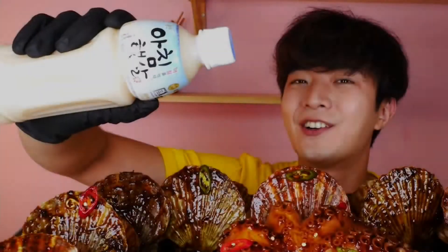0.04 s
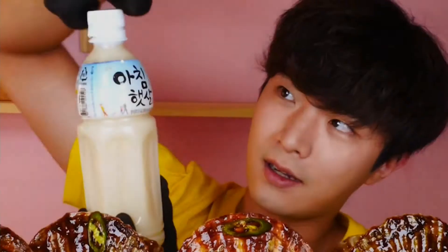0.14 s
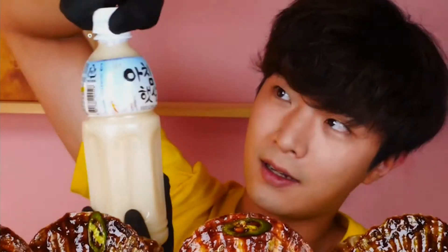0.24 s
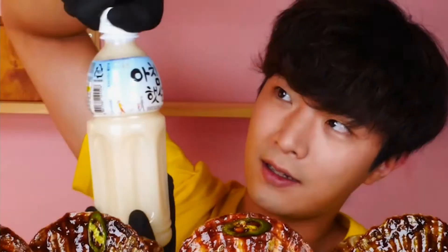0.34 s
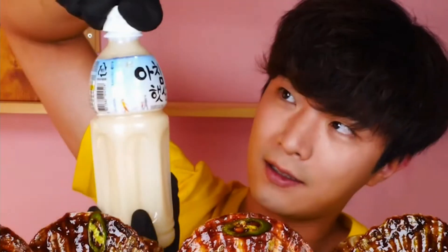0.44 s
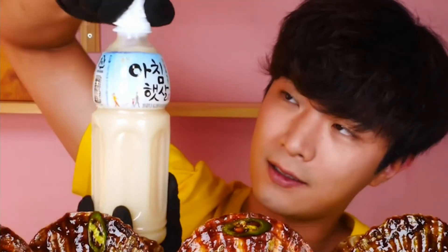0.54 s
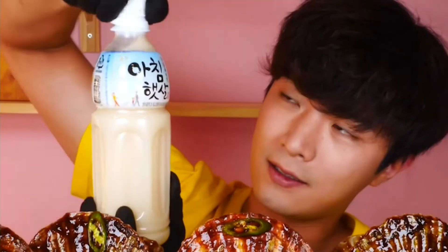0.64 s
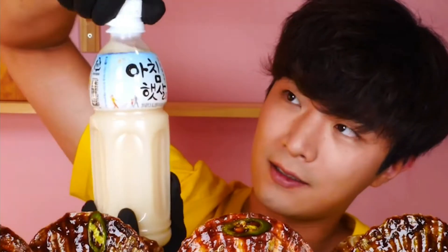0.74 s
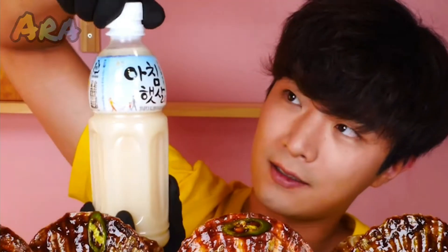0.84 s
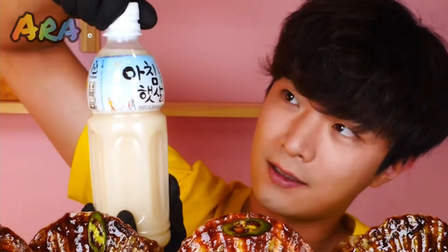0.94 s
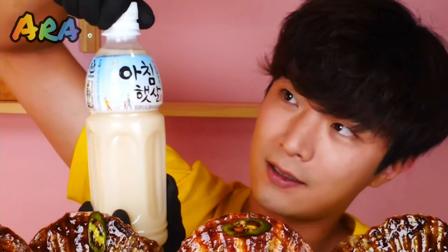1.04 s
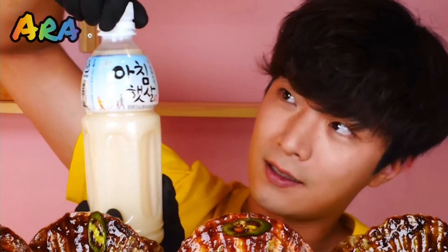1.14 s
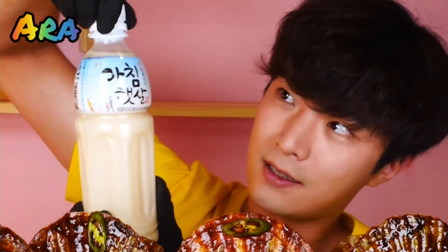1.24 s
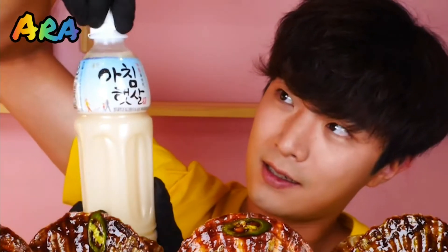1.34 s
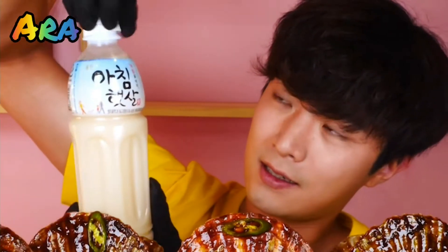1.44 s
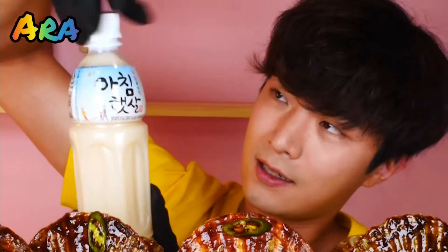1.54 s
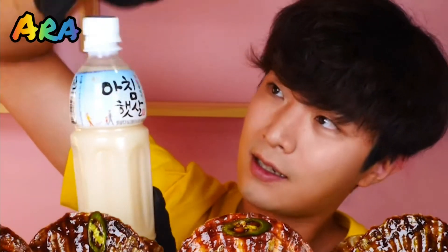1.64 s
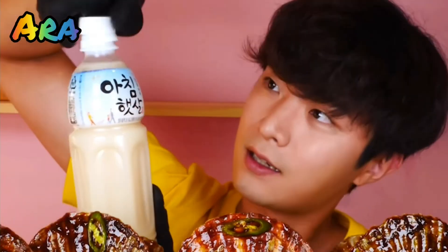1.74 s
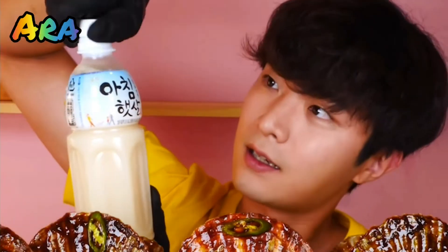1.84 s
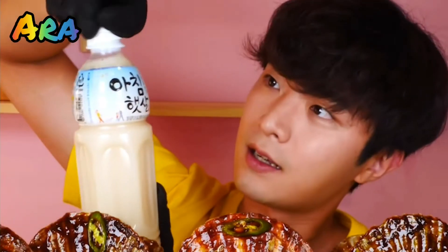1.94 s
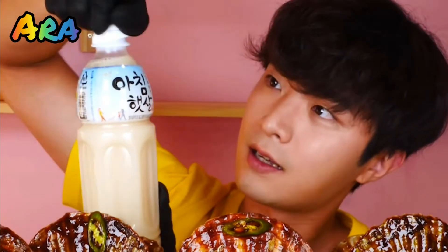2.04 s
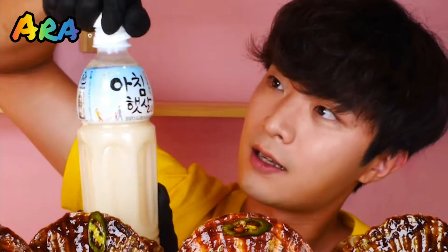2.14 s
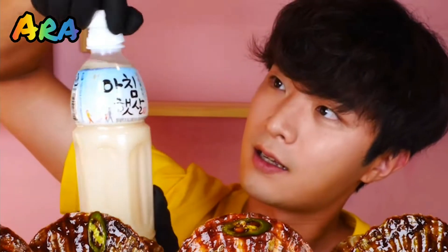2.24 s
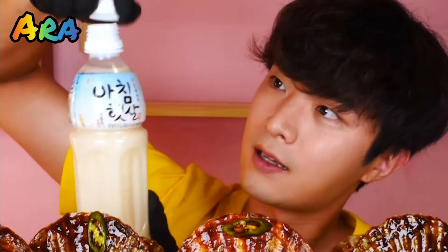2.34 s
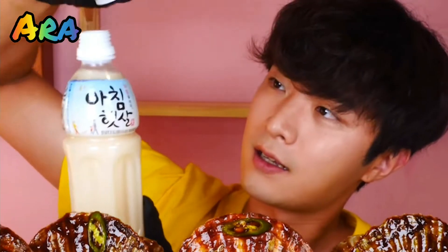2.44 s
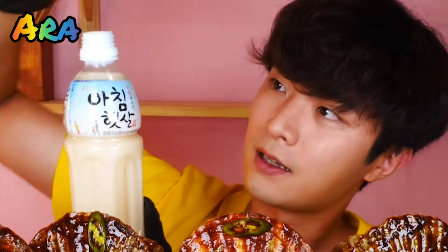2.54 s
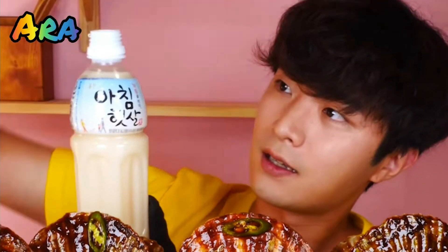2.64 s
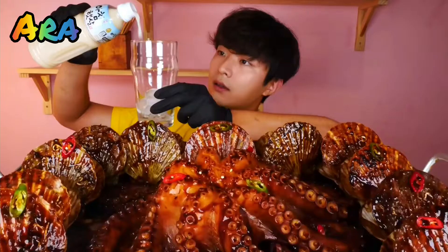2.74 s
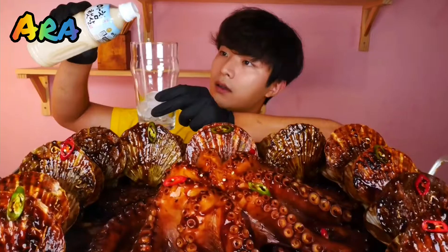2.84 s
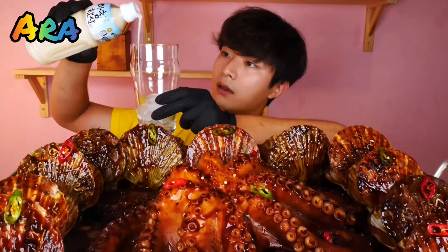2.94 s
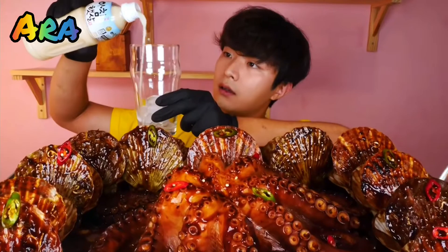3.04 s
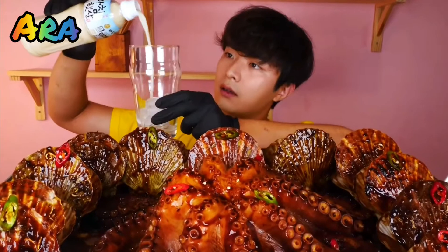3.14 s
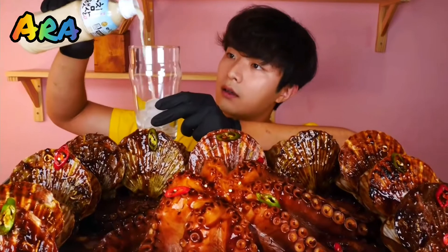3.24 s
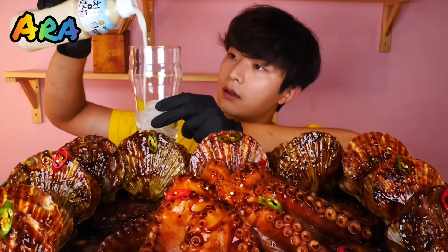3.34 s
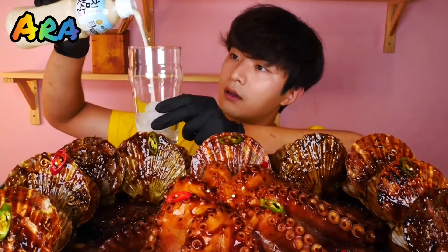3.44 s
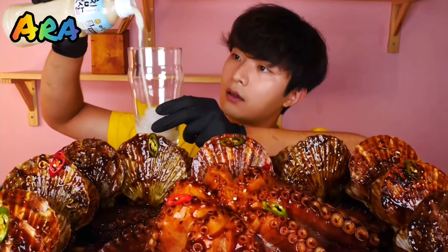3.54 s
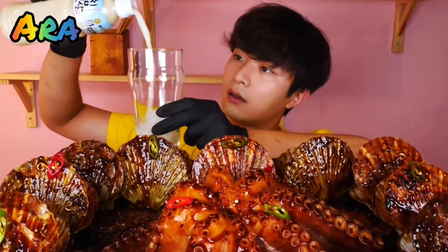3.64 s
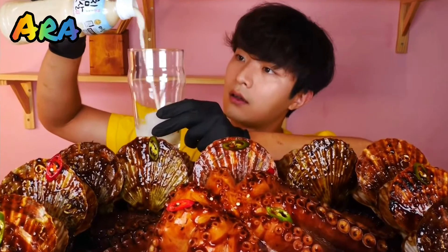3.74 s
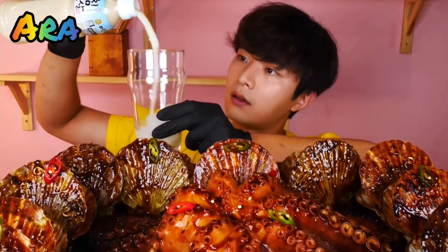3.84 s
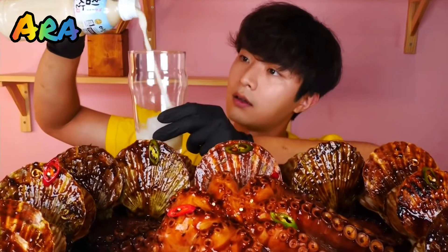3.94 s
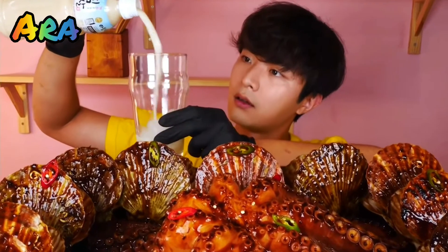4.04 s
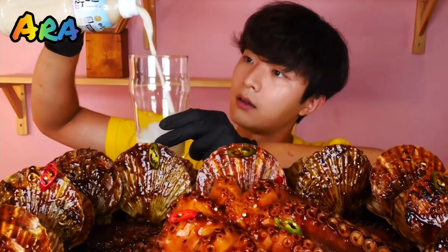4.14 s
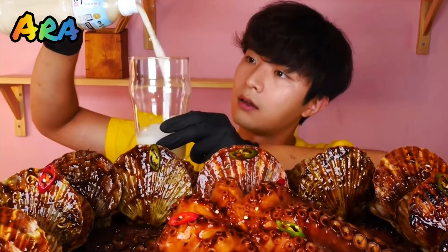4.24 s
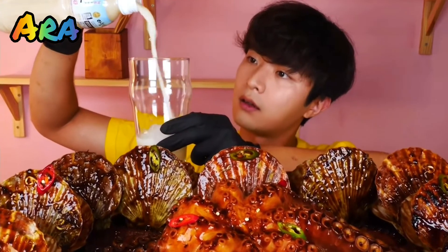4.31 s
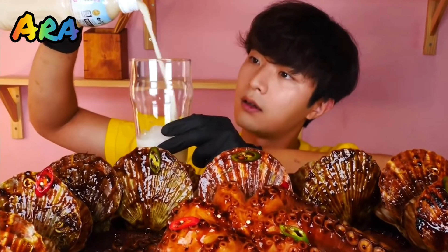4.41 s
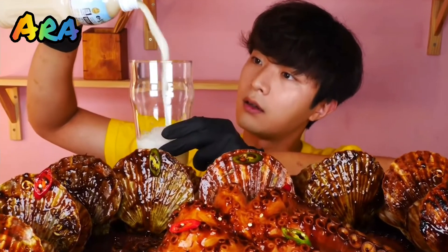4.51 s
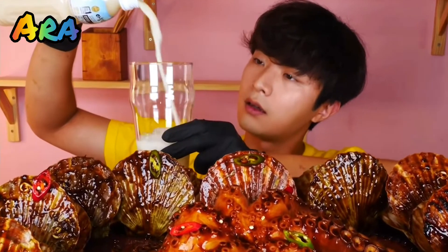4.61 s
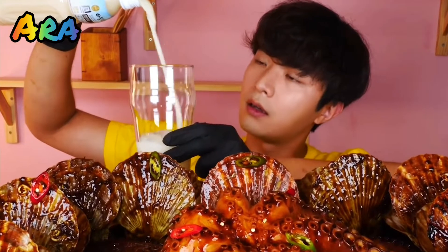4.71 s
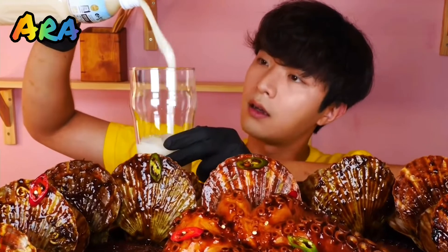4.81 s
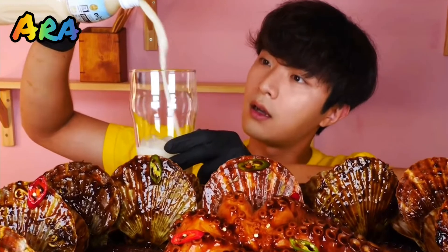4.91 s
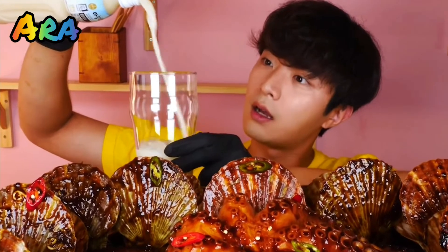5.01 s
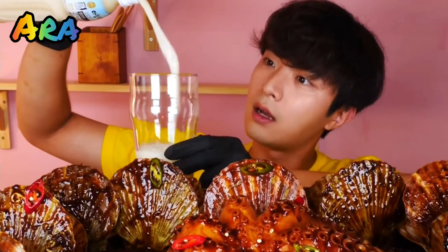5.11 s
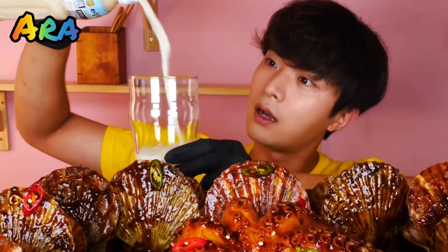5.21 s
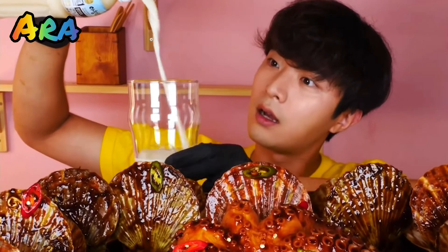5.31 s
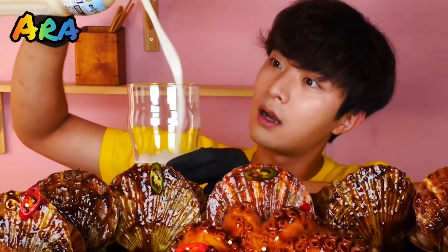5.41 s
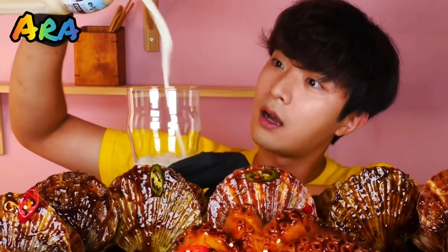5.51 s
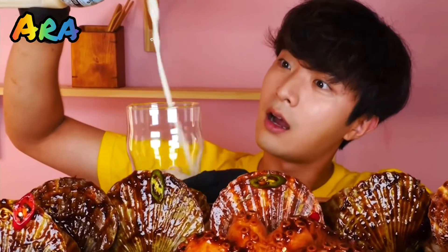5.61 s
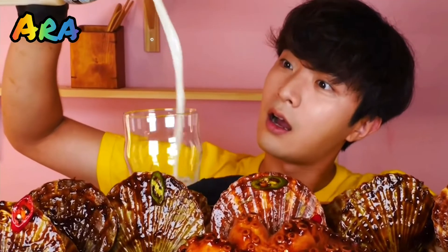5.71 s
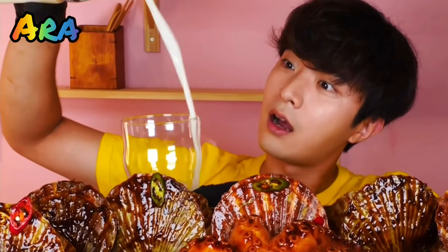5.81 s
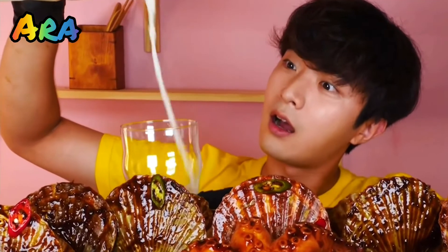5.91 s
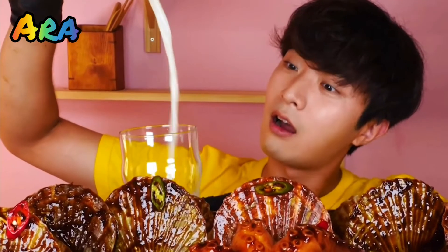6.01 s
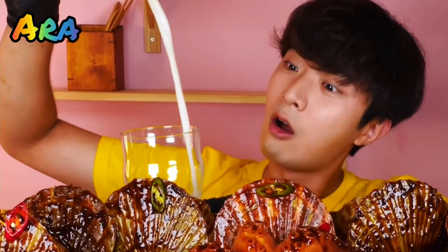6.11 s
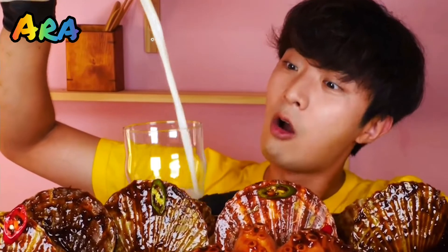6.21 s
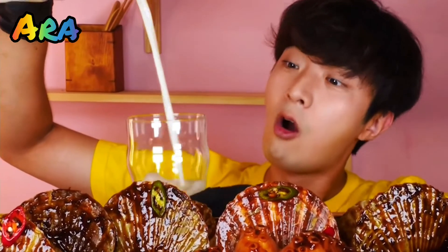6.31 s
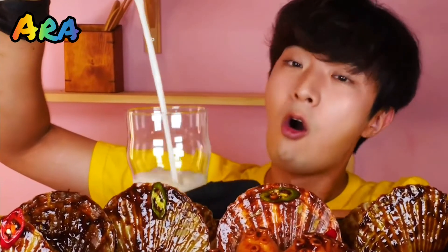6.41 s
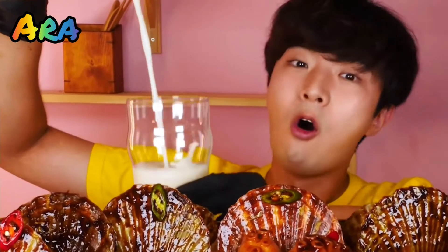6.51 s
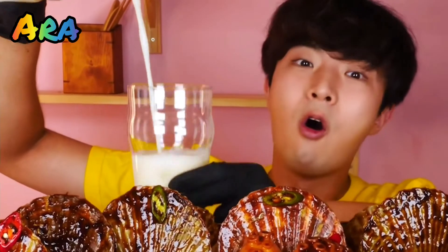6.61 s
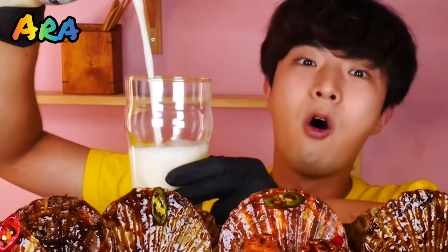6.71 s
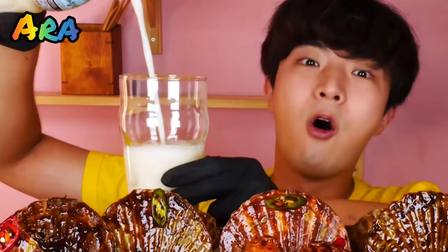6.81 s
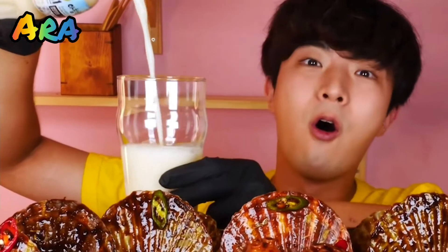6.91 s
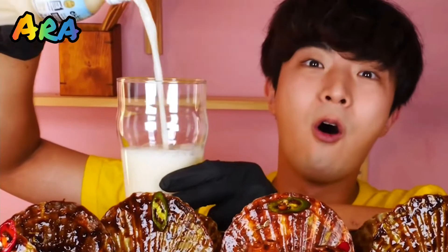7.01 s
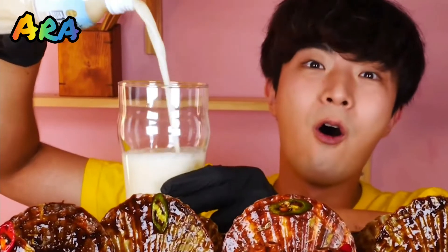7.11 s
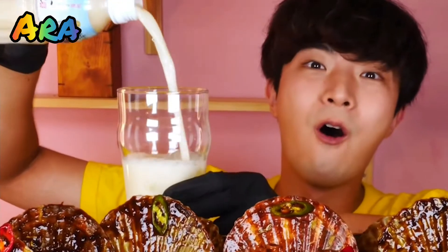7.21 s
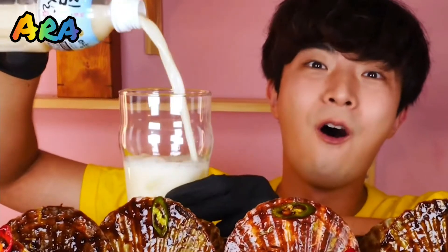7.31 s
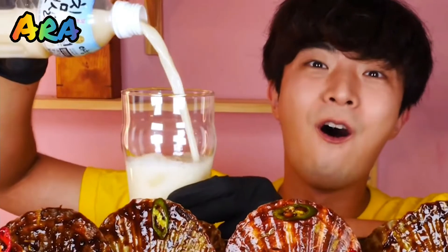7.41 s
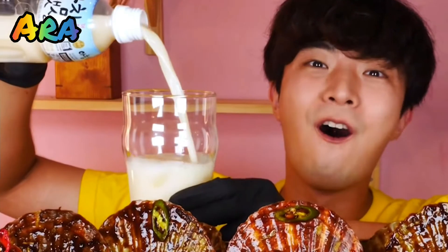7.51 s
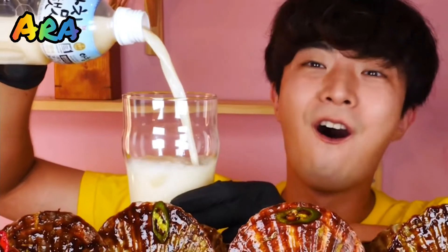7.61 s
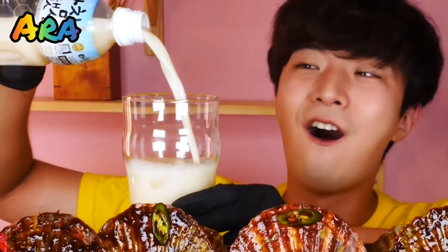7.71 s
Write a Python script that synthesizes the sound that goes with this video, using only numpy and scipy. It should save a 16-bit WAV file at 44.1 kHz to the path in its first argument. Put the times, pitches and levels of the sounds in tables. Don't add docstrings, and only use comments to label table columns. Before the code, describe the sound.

Sharp cap cracks and glove rustle in a quiet humming room, a hollow pop, then bubbly pouring that rings higher as the glass fills.

```python
import sys
import numpy as np
from scipy import signal
from scipy.fft import rfft, irfft, next_fast_len
from scipy.io import wavfile
from scipy.ndimage import map_coordinates

SR = 44100
rng = np.random.default_rng(int(sys.argv[2]) if len(sys.argv) > 2 else 0)


def wav_record(signal):
    frames = np.transpose(np.atleast_2d(signal))
    bounded = np.clip(frames, -1, 1)
    quanta = np.round(bounded * 32767).astype(np.int16)
    wavfile.write(sys.argv[1], SR, quanta)


def rack_gain(trim_db):
    fader = np.asarray(trim_db, float)
    return 10 ** (fader / 20)


N = 342216

# (frequency [Hz], level [dB per Hz])
ROOM_COLOUR = [(12, -35), (20, -8), (32, 4), (86, -7), (123, -4), (177, -10.5), (255, -17), (293, -16.5),
               (399, -35.5), (678, -29.5), (738, -49.5), (849, -39), (5380, -50), (16000, -58.5)]
# (frequency [Hz], level [dB rms])
HUM_TONES = [(57, -57), (119, -65)]
# (time [s], rustle [dB], creak [dB])
GLOVE_LEVELS = [
    (0.0, -61, -74.5),
    (1.08, -58, -56),
    (1.18, -56, -58),
    (1.48, -57, -63),
    (2.13, -53, -64),
    (2.36, -56.5, -70),
    (2.51, -67, -78),
    (2.7, -88, -75.5),
]
# (frequency [Hz], level [dB per Hz])
RUSTLE_COLOUR = [(590, -27), (1000, -2), (2590, -4), (3150, -4.5), (3670, -2), (7790, -3.5), (9940, -7.5),
                 (14600, -15.5), (16000, -23.5)]
# (time [s], peak [dB], ring [Hz], bottle body [dB])
CAP_TICKS = [(0.3308, -9, 6000, -38), (0.3424, -1.5, 4120, -37), (0.5527, -31, 5800, -15),
             (0.6438, -29.5, 4400, -15), (0.8303, -26.5, 4600, -7), (0.856, -31, 8500, -4.5),
             (0.8877, -40.5, 2140, 6), (0.9108, -29, 4480, -2.5), (0.943, -26.5, 3300, -5),
             (0.968, -21.5, 5700, -20), (1.009, -32.5, 1980, -19), (1.045, -30, 2020, -23),
             (1.07, -33, 3800, -12), (1.092, -28, 4580, -18), (1.1246, -31.5, 3200, -28),
             (1.1433, -34, 1940, -16), (1.264, -32.5, 2470, -24), (1.4539, -26.5, 4670, -22),
             (1.697, -34, 2110, -24), (1.8587, -29, 1290, -21), (1.8867, -15, 3180, -53),
             (1.92, -30.5, 3160, -9), (2.2454, -30, 4460, -26)]
# (time [s], length [s], level [dB rms], centre [Hz])
CAP_SCRAPES = [
    (0.346, 0.074, -33.5, 5170),
    (0.931, 0.03, -46.5, 3200),
    (1.147, 0.059, -47.5, 6100),
    (1.3, 0.05, -40.5, 7500),
    (1.373, .055, -46, 6450),
    (1.761, 0.038, -47, 7800),
    (1.8, .07, -50.5, 3000),
]
# (time [s], peak [dB])
CAP_POP = [
    (2.156, -2.5),
]
# (frequency [Hz], level [dB], time to fall 60 dB [s])
NECK_RINGS = [(1036, 1, 0.035), (1290, -10, 0.05), (2680, -17, .04), (3140, 8, 0.018), (4400, -9, 0.018),
              (5700, -11, .03), (7880, -8, .015)]
# (time [s], peak [dB])
BOTTLE_GLUGS = [
    (3.799, -44),
    (3.969, -45),
    (4.26, -44),
    (4.798, -49),
    (5.069, -42),
    (5.411, -43),
    (5.613, -37),
    (5.9, -37.5),
]
# (time [s], level [dB])
GURGLE_LEVELS = [
    (4.1, -66),
    (5.49, -46),
    (5.51, -52.5),
    (7.63, -58.5),
    (7.76, -71),
]
# (time [s], frequency [Hz])
AIR_PITCH = [
    (2.7, 645),
    (3.5, 704),
    (4.5, 742),
    (5.3, 825),
    (6.1, 850),
    (6.7, 931),
    (7.3, 1007),
    (7.76, 1040),
]
# (frequency [Hz], width [Hz], level [dB])
GLASS_MODES = [(2672, 30, 3), (3160, 40, -11), (4590, 1320, -7), (7570, 330, -6)]
# (time [s], peak [dB], bubble [Hz], air column kick [dB], slap [dB])
BIG_DROPS = [(2.7142, -30.5, 3450, -29.5, -9.5), (2.7585, -29.5, 1670, -28, -13),
             (2.8091, -15.5, 3550, -13, -47), (2.86, -33.5, 1990, -27, -17), (2.8922, -48, 2250, -20, -19),
             (2.8927, -24.5, 2060, -35, -25), (2.913, -26.5, 3420, -40, -34),
             (2.9861, -37.5, 3170, -27, -18), (3.0277, -30, 4150, -35, -23), (3.1299, -32, 8030, -28, -10),
             (3.1918, -20, 5900, -43, -11), (3.2147, -42, 8400, -14, -2.5), (3.2328, -23, 8230, -31, -12),
             (3.2689, -22.5, 1820, -33, -21), (3.3156, -19, 4600, -14, -16.5),
             (3.456, -16.5, 8050, -52, -8), (3.4725, -15.5, 3830, -21.5, -16.5),
             (3.5874, -20.5, 1990, -11.5, -28), (3.6841, -35, 2980, -0.5, -20),
             (3.703, -26, 1880, -21, -28), (3.7696, -28.5, 4670, -22, -13),
             (3.9984, -17.5, 1940, -17, -16.5), (4.0468, -22, 2030, -11.5, -10.5),
             (4.0697, -26, 2700, -9, -14.5), (4.1286, -29.5, 1550, -31, -16),
             (4.1287, -22.5, 3980, -15.5, -11), (4.173, -25, 2514, -5, -13),
             (4.1882, -16, 2040, -14, -11.5), (4.2805, -30, 2550, -28, -6),
             (4.2957, -15.5, 5880, -14, -6.5), (4.3323, -16.5, 2780, -7.5, -18.5),
             (4.3765, -19.5, 2050, -1, -8.5), (4.404, -20.5, 2060, -4, -11),
             (4.4487, -17.5, 5970, -8.5, -16), (4.4725, -15.5, 4550, -8, -25),
             (4.4888, -17, 2500, -0.5, -12), (4.5199, -14.5, 2080, -7, -20.5),
             (4.6275, -24, 2590, -3.5, -12.5), (4.6386, -18, 2550, 2, -21),
             (4.7616, -14.5, 2520, -8.5, -20), (4.824, -17.5, 2700, -4.5, -29.5),
             (4.8345, -17.5, 2570, -12, -22.5), (4.881, -21, 2640, -13, -20),
             (4.9003, -1.5, 2310, -24.5, -30), (4.9278, -5, 2570, -14.5, -34),
             (5.0076, -44, 2710, 6.5, -17), (5.033, -22, 3740, -14, -28), (5.063, -41, 1520, 3, -15),
             (5.063, -23, 2650, -7, -15.5), (5.0921, -10, 2400, -10.5, -21),
             (5.1238, -18.5, 4230, -6, -19.5), (5.1643, -21.5, 2630, -18, -17),
             (5.2034, -1, 2440, -13.5, -23.5), (5.286, -21.5, 2740, -15, -22.5),
             (5.3069, -31.5, 3250, -14, -16.5), (5.3427, -16, 2550, -20, -25),
             (5.3638, -8.5, 2340, -7.5, -18.5), (5.3902, -16, 2740, -5.5, -18.5),
             (5.4586, -28, 2680, 5, -21.5), (5.508, -25, 2520, -4, -13.5), (5.5197, -21.5, 2600, -3, -17.5),
             (5.6108, -28, 4400, -18, -13.5), (5.6719, -24.5, 2620, 0.5, -20.5),
             (5.7379, -21, 4660, -9, -26), (5.7798, -19.5, 2640, -7, -26), (5.8058, -20, 3760, -10.5, -26),
             (5.844, -29, 2620, -17.5, -22), (5.8798, -17.5, 3950, -9, -19), (5.9101, -22.5, 2650, -4, -21),
             (5.929, -16, 2450, -7.5, -26), (6.0117, -24, 2680, -1, -25), (6.053, -21.5, 4530, -8, -11),
             (6.0834, -11, 4200, -11, -26), (6.112, -24, 2730, -16, -9), (6.127, -16.5, 6600, -20.5, -12.5),
             (6.1889, -22.5, 4200, 1, -11.5), (6.2245, -20.5, 2690, -21, -10),
             (6.2546, -23, 4200, -16, -19.5), (6.2648, -18, 4670, -16, -19), (6.3131, -19.5, 4460, -7, -22),
             (6.3755, -31, 2720, 3, -13), (6.384, -23.5, 2660, 0, -11), (6.4099, -26.5, 2600, -0.5, -14.5),
             (6.4602, -22, 4150, -4, -23.5), (6.4801, -20, 2630, -2.5, -15.5),
             (6.5506, -23.5, 2800, -5.5, -7), (6.5809, -21, 2670, -3.5, -21), (6.6094, -20, 5940, -10, -17),
             (6.6271, -15.5, 2960, -1, -19), (6.6723, -17.5, 4760, -1.5, -7.5),
             (6.6895, -15, 2770, -9, -11), (6.7661, -24.5, 6200, -11.5, -17),
             (6.806, -19.5, 3830, -7.5, -14), (6.8649, -21, 2790, -9, -31), (6.969, -22, 3780, -6.5, -16.5),
             (7.0196, -23.5, 8910, -17, -13), (7.037, -26, 2680, 1, -38), (7.1187, -30, 6910, -3, -13.5),
             (7.2204, -32, 2720, -1, -11), (7.2745, -28, 1640, 5, -29), (7.3451, -24, 2740, 0, -21),
             (7.3983, -31.5, 4100, -11, -22.5), (7.5328, -23, 1500, -3.5, -27),
             (7.6104, -18, 4080, -7.5, -24), (7.742, -41.5, 2690, -16, -34)]
# (time [s], air column [dB], splash [dB], spray [dB])
POUR_LEVELS = [
    [(2.7, -67, -54, -69.5), (2.76, -52, -72, -74.5), (3.3, -86, -54, -63)],
    [(3.315, -35.5, -40, -52.5), (3.379, -29, -37, -53.5), (3.52, -50.5, -49, -52.5)],
    [(3.54, -72, -52.5, -60), (3.582, -49, -53.5, -55), (3.97, -50.5, -49.5, -54.5)],
    [(3.99, -41, -43, -55), (4.06, -34.5, -43.5, -41), (4.12, -57, -54, -54), (4.16, -36, -47, -52),
     (4.39, -34, -42.5, -41), (5.01, -30, -34.5, -48.5), (5.76, -34.5, -37.5, -49), (6.22, -37, -40.5, -40),
     (6.5, -36.5, -41.5, -45), (6.7, -28, -38.5, -50)],
    [(6.72, -30.5, -40.5, -51), (7.162, -41, -51, -65), (7.674, -38.5, -42.5, -62), (7.76, -50, -56, -86)],
]
# (frequency [Hz], level [dB per Hz])
SPRAY_COLOUR = [(2940, -42), (5000, -0.5), (6160, -3.5), (6700, -4), (11200, -11), (16000, -34.5)]
# (frequency [Hz], side against middle [dB])
SIDE_LEVEL = [(3300, -90), (3800, -21), (8000, -19), (16000, -15)]


def unit(x):
    return x / np.sqrt(np.mean(x ** 2) + 1e-20)


def along(points, hz):
    f, v = np.transpose(points)
    return np.interp(np.log(hz + 1), np.log(f + 1), v)


def curves(rows, outside=-120):
    s, *columns = np.transpose(rows)
    t = np.arange(N) / SR
    return [np.interp(t, s, values, left=outside) for values in columns]


def wobble(rate):
    knots = rng.standard_normal(int(N * rate / SR) + 4)
    return map_coordinates(knots, [np.arange(N) * rate / SR])


def filtered(x, response):
    size = next_fast_len(N + SR // 2)
    hz = np.fft.rfftfreq(size, 1 / SR)
    return irfft(rfft(x, size) * response(hz), size)[:N]


def noise(spectrum):
    return unit(filtered(rng.standard_normal(N), lambda hz: rack_gain(along(spectrum, hz))))


def pings(s, gain, hz, cycles, rise, size, soft=0.034):
    k = np.arange(size)
    age = np.outer(hz / cycles, k / SR)
    turns = np.reshape(cycles, (-1, 1)) * (age + rise * age ** 2 / 2)
    audible = hz[:, None] * (1 + rise * age) < SR / 2.2
    envelope = np.exp(-age) * (1 - np.exp(-age / soft))
    waves = gain[:, None] * audible * envelope * np.sin(2 * np.pi * turns)
    at = np.round(s * SR).astype(int)[:, None] + k
    return np.bincount(at.ravel(), waves.ravel(), N + SR)[:N]


def shower(count, hz, octaves, spread_db, cycles, rise, size, soft=0.2):
    when = rng.random(count) * N / SR
    pitch = np.minimum(hz * 2 ** (octaves * rng.standard_normal(count)), 15000)
    big = np.minimum(rng.exponential(size=count), 3.5)
    return unit(pings(when, rack_gain(spread_db * big), pitch, cycles, rise, size=size, soft=soft))


def bursts(s, gain, t60):
    spikes = np.bincount(np.round(s * SR).astype(int), gain, N)[:N]
    envelope = signal.lfilter([1], [1, -rack_gain(-60 / (t60 * SR))], spikes)
    return envelope * rng.standard_normal(N)


def room():
    t = np.arange(N) / SR
    hum = np.zeros(N)
    for hz, db in HUM_TONES:
        level = rack_gain(db + 1 + 3.5 * wobble(2.9))
        hum += level * np.sin(2 * np.pi * hz * t + 0.5 * wobble(8))
    rumble_db = -53 + 2.0 * wobble(0.74)
    return rack_gain(rumble_db) * noise(ROOM_COLOUR) + hum


def hands():
    rustle_db, creak_db = curves(GLOVE_LEVELS)
    grain = shower(count=4000, hz=4950, octaves=0.7, spread_db=-1, cycles=0.89, rise=0, size=64)
    rustle = rack_gain(rustle_db + 2.9 * wobble(30)) * unit(noise(RUSTLE_COLOUR) + 0.1 * grain)
    creak_colour = [(200, -24), (350, -6.5), (900, -10.5), (1500, -23), (20000, -77.5)]
    creak = rack_gain(creak_db + 3 * wobble(44)) * noise(creak_colour)
    return rustle + creak


def thread_ticks():
    s, db, hz, body_db = np.transpose(CAP_TICKS)
    clicks = bursts(s, rack_gain(db - 6.5), t60=0.008)
    rings = pings(s, rack_gain(db - 3.5), hz, cycles=2.7, rise=0, size=512)
    body = pings(s, rack_gain(db + body_db), 450 + 0 * hz, cycles=1.5, rise=0, size=1024)
    thump = pings(np.array([0.35]), rack_gain([-33]), np.array([105]), cycles=4.1, rise=0.057, size=8192, soft=0.3)
    return clicks + rings + body + thump


def scrapes():
    t, out = np.arange(N) / SR, np.zeros(N)
    for s, length, db, hz in CAP_SCRAPES:
        swell = np.sin(np.pi * np.clip((t - s) / length, 0, 1))
        colour = [(hz / 12, -30), (hz / 3, -7), (hz, 0), (hz * 1.6, -7), (20000, -14)]
        out += rack_gain(db + 3.6 * wobble(250)) * swell * noise(colour)
    return out


def cap():
    s, db = CAP_POP[0]
    t = np.arange(SR // 4) / SR
    ring = sum(rack_gain(level - 60 * t / t60) * np.sin(2 * np.pi * hz * t) for hz, level, t60 in NECK_RINGS)
    out = bursts(np.array([s]), rack_gain([db - 4]), t60=0.0051)
    onset = 1 - np.exp(-t / 0.00022)
    out[round(s * SR):][:len(t)] += rack_gain(db - 9) * ring * onset
    return out


def glugs():
    s, db = np.transpose(BOTTLE_GLUGS)
    first = pings(np.array([2.765]), rack_gain([-28]), np.array([330]), cycles=11, rise=0.3, size=4000, soft=2.6)
    return pings(s, rack_gain(db), 75 + 0 * s, cycles=2.78, rise=0.306, size=8192, soft=0.15) + first


def gurgle():
    bubbles = shower(count=400, hz=332, octaves=0.2, spread_db=4, cycles=4.4, rise=0.044, size=4000)
    return rack_gain(curves(GURGLE_LEVELS)[0] + 0.5) * bubbles


def column(x, multiple, width_hz):
    pitch = curves(AIR_PITCH, outside=1260)[0]
    turn = np.exp(2j * np.pi * multiple * np.cumsum(pitch) / SR)
    keep = np.exp(-np.pi * width_hz / SR)
    return np.real(signal.lfilter([1], [1, -keep], x / turn) * turn)


def glass(x, plain):
    def response(f):
        modes = [rack_gain(db) * 1j * f * w / (c * c - f * f + 1j * f * w) for c, w, db in GLASS_MODES]
        return plain + sum(modes)
    return filtered(x, response)


def drops():
    s, db, hz, column_db, slap_db = np.transpose(BIG_DROPS)
    luck = rng.random((len(s), 2))
    puffs = bursts(s, rack_gain(db + slap_db + 6.5), t60=0.035)
    slap = filtered(puffs, lambda f: 1j * f / (4000 + 1j * f) / (1 + 1j * f / 11000))
    bubble = pings(s, rack_gain(db), hz, cycles=4 + hz / 800, rise=0.029, size=1024, soft=0.12)
    twin_s = s + 0.0044 * luck[:, 0]
    twin_hz = hz * 2 ** (1.72 * luck[:, 1] - 0.7)
    twin = pings(twin_s, rack_gain(db - 2), twin_hz, cycles=4.1, rise=0.049, size=600, soft=0.066)
    kicks = pings(s, rack_gain(db + column_db - 20), 800 + 0 * s, cycles=0.74, rise=0, size=400, soft=0.21)
    return glass(slap + bubble + twin, plain=0.53) + column(kicks, multiple=1, width_hz=63)


def stream():
    column_db, splash_db, spray_db = curves(np.vstack(POUR_LEVELS))
    clump = wobble(35)

    pushes = shower(count=3000, hz=850, octaves=0.39, spread_db=1.5, cycles=1.5, rise=0, size=384)
    ringing = column(rack_gain(4.2 * clump) * pushes, multiple=1, width_hz=122)
    blips = shower(count=900, hz=850, octaves=0.4, spread_db=4, cycles=5.17, rise=0.08, size=1500)
    air = unit(unit(ringing) + 0.46 * unit(rack_gain(5.1 * clump) * blips))

    bubbles = shower(count=4000, hz=3200, octaves=0.6, spread_db=3.5, cycles=5.5, rise=0.065, size=600)
    wash = noise([(300, -15), (1500, 7), (6000, -7), (16000, -33)])
    splash_swell = rack_gain(5.1 * clump + 2.8 * wobble(60))
    splash = unit(glass(splash_swell * (bubbles + 0.43 * wash), plain=0.68))

    crackle = shower(count=6000, hz=8860, octaves=0.44, spread_db=10, cycles=6.9, rise=0.018, size=200)
    spray_swell = rack_gain(3.9 * clump + 6.1 * wobble(63))
    spray = unit(spray_swell * (crackle + 0.4 * noise(SPRAY_COLOUR)))
    return rack_gain(column_db - 2) * air + rack_gain(splash_db + 2.5) * splash + rack_gain(spray_db + 1.5) * spray


def scene():
    near = hands() + thread_ticks() + scrapes() + cap() + glugs() + gurgle() + drops() + stream()
    tail = bursts(np.array([0.003]), np.ones(1), t60=0.11)[:SR // 4]
    echo = signal.fftconvolve(near, tail / np.linalg.norm(tail))[:N]
    mid = room() + near + rack_gain(-16) * echo
    side = filtered(mid, lambda hz: 1j * rack_gain(along(SIDE_LEVEL, hz)))
    return np.array([mid + side, mid - side])


def top_cut(x):
    return signal.sosfilt(signal.butter(12, 17140, fs=SR, output="sos"), x)


def record(dry):
    def treble_limit(hz):
        return np.where(hz < 16000, 1, rack_gain(-14) * (hz < 16800))
    mix = np.array([filtered(x, treble_limit) for x in dry])
    return top_cut(mix)


dry = scene()
out = record(dry)
wav_record(out)
```